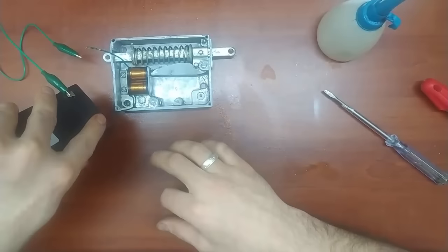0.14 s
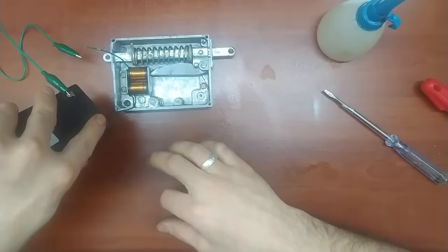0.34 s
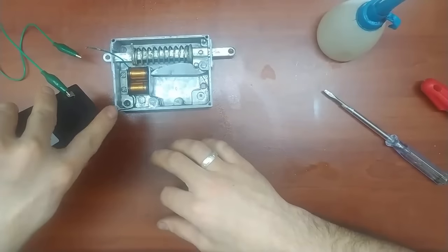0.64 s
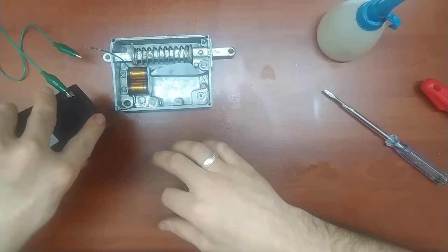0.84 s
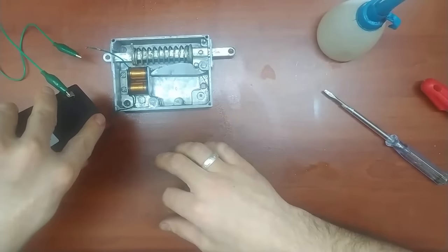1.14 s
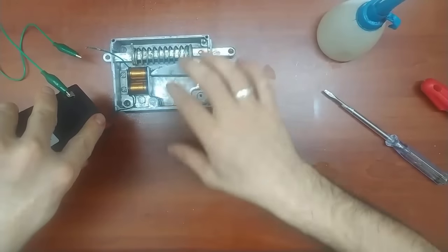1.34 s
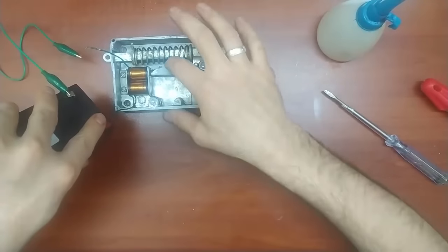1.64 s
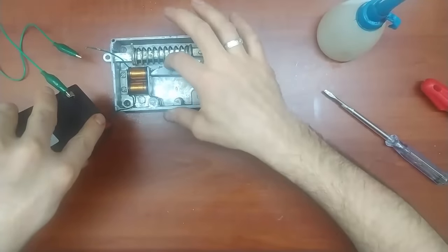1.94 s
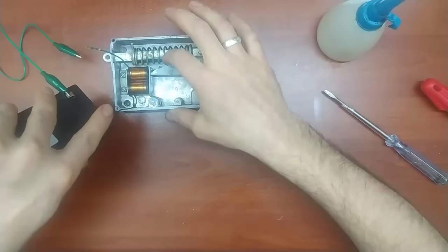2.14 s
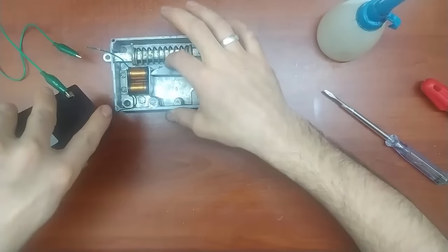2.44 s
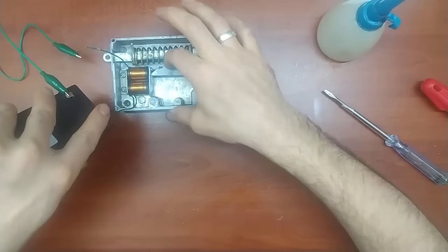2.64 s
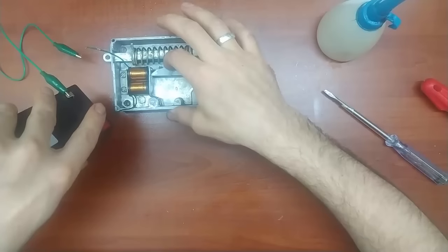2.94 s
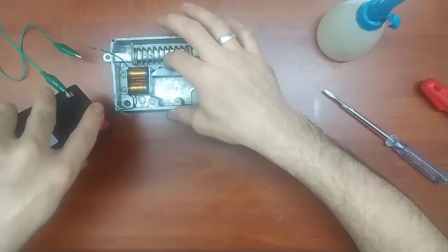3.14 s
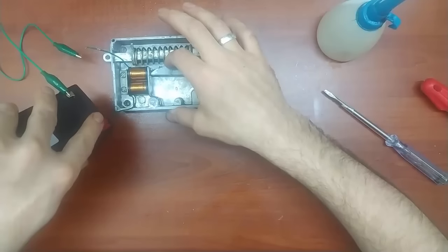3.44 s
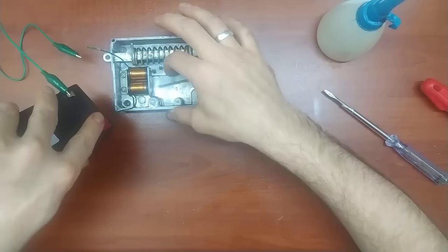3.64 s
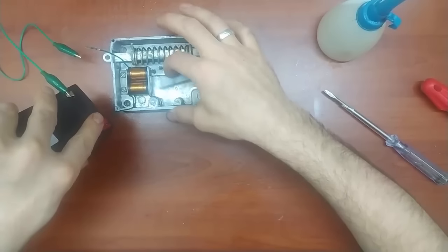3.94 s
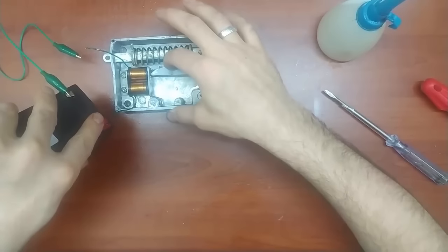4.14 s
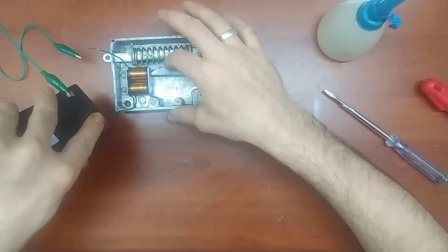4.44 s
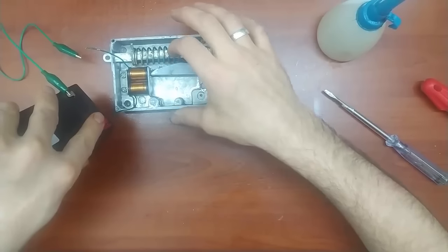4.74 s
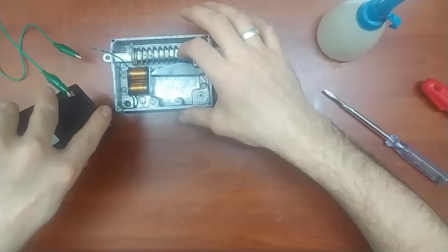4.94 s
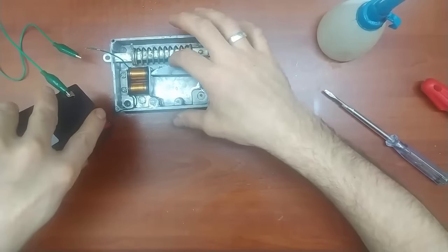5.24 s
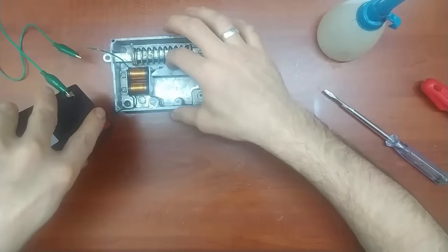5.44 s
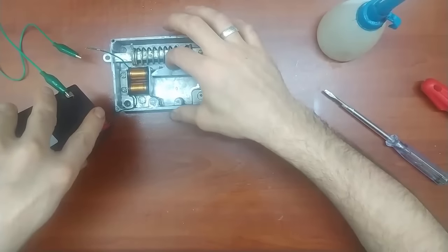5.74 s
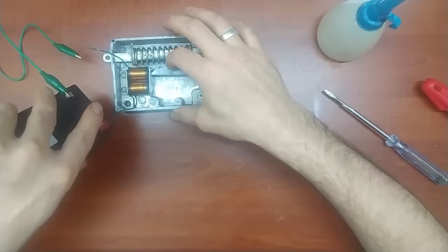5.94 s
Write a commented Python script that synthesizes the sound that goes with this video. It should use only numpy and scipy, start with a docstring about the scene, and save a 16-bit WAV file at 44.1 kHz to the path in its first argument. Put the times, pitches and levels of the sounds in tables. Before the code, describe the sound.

Close stereo pickup above a wooden table in a small quiet room. An electric lock's solenoid knocks, its armature drops back with a quick bouncing clack, then it knocks again. Fingers faintly brush the case, the bolt slams once, another drop follows, then a run of bright alternating catch clicks, a knock, three hard ringing slams and a last drop before faint ticks.

```python
"""An open electric door lock is worked on a wooden table in a small room, with two microphones close above.
The solenoid knocks and its armature drops back bouncing; a hand pushes the sprung bolt, which works
its catch up and down and slams home. Blows are shaped noise, with decaying modes for the steel case and
the table. Sliding fingers are sparse random grains; low room tone is filtered noise behind it all."""
import sys
import numpy as np
from scipy import signal
from scipy.fft import rfft, irfft
from scipy.io import wavfile
from scipy.ndimage import uniform_filter1d

SR = 44100
rng = np.random.default_rng(int(sys.argv[2]) if len(sys.argv) > 2 else 0)


def unload_wav(signal):
    """Save mono or channel-first audio to the path in sys.argv[1] as 16-bit WAV at rate SR, clipped to [-1, 1]."""
    wavfile.write(
        sys.argv[1],
        SR,
        np.round(np.clip(np.atleast_2d(signal).T, -1, 1) * 32767).astype(np.int16),
    )


N = 268560  # length of the scene [samples]
SIZE = 16384  # length of one blow [samples]
T, HZ = np.arange(SIZE) / SR, np.fft.rfftfreq(SIZE, 1 / SR)

# Event levels are relative: each kind of blow adds its own gain; boom, clack and treble tilt its colour.
# The solenoid pulls in; the hand muffles the last pull: (time [s], level [dB], clack near 2.4 kHz [dB])
KNOCKS = [(0.0237, -10.5, 2), (0.7587, -10.5, 1.5), (3.3352, -12, -7)]
# The armature falls back: (time [s], level [dB])
DROPS = [(0.446, -12.5), (2.0585, -14), (4.834, -14.5)]
# The bolt hits its stop, rocking the case on the table more or less: (time [s], level [dB], boom [dB])
SLAMS = [(1.890, -4, 2), (3.8033, -2.5, -1), (4.0925, -5, -1), (4.354, -2.5, -0.5)]
# The catch is pushed up: (time [s], level [dB])
LIFTS = [(2.7462, -14.5), (2.930, -8.5), (3.0942, -8)]
# The catch snaps down: (time [s], level [dB])
SEATS = [(2.8452, -11), (3.036, -9.5), (3.226, -11)]
# Loose parts touch, and a finger scrapes briefly at 0.544 s: (time [s], level [dB], clack near 2.4 kHz [dB],
# treble [dB])
TICKS = [(.544, -33, 0, 13.5), (2.512, -33.5, -8.5, -2), (5.4285, -20, 8.5, 4), (5.938, -25.5, -3, 12)]
# Fingers bump the case: (time [s], level [dB], clack near 2.4 kHz [dB], treble [dB])
BUMPS = [(1.562, -46.5, -2, 6), (1.592, -41, 9, -7), (2.659, -42.5, 4, -4), (5.249, -47, 16, 12),
         (5.694, -39.5, 2, -14)]
# Fingers slide: (time [s], length [s], level [dB])
RUBS = [(1.205, 0.37, -76.5), (1.491, 0.16, -66), (1.662, 0.049, -67), (2.341, 0.079, -64.5),
        (5.254, 0.044, -69)]

# Relative colour of each kind of contact: (frequency [Hz], density [dB per Hz])
KNOCK_COLOUR = [(100, -26.5), (140, -19.5), (200, -6.5), (560, -4), (800, -3.5), (1150, -10.5), (1750, -8),
                (2500, -18.5), (4000, -21.5), (5500, -20), (7000, -27.5), (8500, -19), (11500, -25),
                (15500, -32)]
DROP_COLOUR = [(100, -15), (180, -9), (300, -2.5), (400, -9), (560, -2.5), (900, -3), (1600, -4),
               (3000, -6), (4300, -8.5), (6800, -10.5), (8500, -5.5), (11000, -14.5), (13000, -16),
               (15500, -22)]
SLAM_COLOUR = [(100, -18.5), (160, -8), (230, -2.5), (400, -6.5), (700, -4), (1500, -2), (2700, -1),
               (3500, -3.5), (5200, -5), (7000, -8.5), (8500, -2.5), (11000, -8), (13200, -11.5),
               (15500, -20)]
LIFT_COLOUR = [(100, -14), (190, -10), (270, -2), (420, -13.5), (820, -4.5), (1150, -5.5), (1900, -4.5),
               (2600, 4.5), (3400, -2), (4400, -1.5), (7000, 1), (8700, 1), (11000, -7.5), (15500, -13.5)]
SEAT_COLOUR = [(100, -10.5), (190, -8), (290, 6), (520, -1), (830, 0), (1130, -1), (1600, 1.5),
               (2800, -3.5), (4500, -0.5), (7000, -8.5), (8700, 0.5), (11000, -6.5), (13200, -5),
               (15500, -16.5)]
TICK_COLOUR = [(100, -3.5), (250, 4), (500, -2), (900, 8.5), (1300, 3), (1900, 1.5), (2550, 3.5),
               (4000, -2.5), (5500, 4.5), (7500, -6.5), (9400, -3.5), (11000, -15), (13000, -10),
               (15500, -34)]
BUMP_COLOUR = [(100, -5), (260, 7), (450, -5.5), (900, -7), (2000, -27.5), (6000, -37), (10000, -27.5),
               (15000, -53)]
RUB_COLOUR = [(100, -11), (300, 4), (950, 2.5), (1600, -9), (2600, -9.5), (6000, -15), (10500, -15.5),
              (15500, -22.5)]

# Resonances of table top and case, heard in every blow: (frequency [Hz], width [Hz], height [dB])
BODY_PEAKS = [(178, 15, 4), (233, 18, 7.5), (235, 29, -4), (272, 32, 3), (416, 40, -4), (454.2, 28, 3),
              (520, 22, 2.5), (569.4, 26, 1), (665, 94, -3), (784, 40, 0.5), (935.5, 73, 2.5),
              (1310, 130, 2.5), (1760, 190, 3), (3340, 200, -2)]
# Resonances of the part that is struck: (frequency [Hz], width [Hz], height [dB])
CORE_PEAKS = [(290, 41, 3), (385, 31, -4.5), (474, 140, 3.5), (681, 94, 5.5), (1645, 45, 5.5),
              (2370, 380, 4.5), (7900, 290, 1.5)]
ARMATURE_PEAKS = [(340, 60, 5.3), (551, 42, 9.8), (1375, 42, 1.9), (5060, 560, 7.8), (5380, 800, 7.5)]
BOLT_PEAKS = [(1109, 80, 1.2), (1414, 120, 1.1), (1990, 120, 1), (2720, 220, 5.6), (4330, 560, 5.4),
              (4455, 460, 7)]
CATCH_PEAKS = [(2405, 265, 3.8), (8930, 300, 4.3)]
SEAT_PEAKS = [(835, 120, 7), (2760, 320, 6.5), (4400, 370, 6), (5415, 350, 4.5), (9480, 300, 4.5)]  # the seat that the catch snaps into
# Long modes of the steel case and spring: (frequency [Hz], relative level [dB], t60 [s])
STEEL_MODES = [(1427, -7, .2), (1818, -2, .24), (2422, -8, .19), (2715, -2, .19), (4184, -1, .22),
               (4401, -3, .23), (4496, -5, .21), (4698, -2, .22), (7855, -6, .13), (9029, -2, .17),
               (9175, -2, .17), (9255, -5, .16), (9352, 0, .17), (9383, -2, .16)]
# Long modes of the wooden table top: (frequency [Hz], relative level [dB], t60 [s])
WOOD_MODES = [(178, -11, .3), (217, -5, .33), (279, -3, .3), (456, -3, .19), (518, -1, .2), (566, 2, .19),
              (624, -3, .17)]
# Turning points of the tilt of a blow, from boom through clack to treble: (frequency [Hz])
TOUCH_HZ = [400, 1100, 2400, 5000, 11000]

# How a blow dies away by band; each kind scales the t60 and shifts the crack:
# (frequency [Hz], room t60 [s], rise [s], direct crack over the room [dB], left-right likeness [-1 to 1])
ROOM_BANDS = [(119, .45, 0.028, -6, 0.99), (260, .32, .003, -4, .92), (543, 0.27, .0032, 4, 0.64),
              (1090, .27, 0.0023, 4, 0), (2560, 0.23, 0.001, 2.5, .25), (4870, .2, .0004, 4.5, .07),
              (9300, 0.2, .0004, 2, 0), (15000, .19, 0.00035, 4.5, 0)]
# Relative colour of the room tone: (frequency [Hz], density [dB per Hz])
HUSH_COLOUR = [(12, -26.5), (20, 2), (38, -3.5), (55, -12), (86, -13), (127, -23.5), (241, -17), (377, -27),
               (446, -23.5), (485, -26.5), (949, -27), (2080, -37), (3530, -42), (10500, -47), (16000, -65)]
# Resonances of the microphone port: (frequency [Hz], width [Hz], height [dB])
PORT_PEAKS = [(9300, 1100, 9), (9700, 210, 1.5), (13200, 560, 3.5)]

RING_DB_PER_DB = 1.06  # the harder a blow is for its kind, the larger the share of steel ring
GAP_SHRINK = .85  # each rebound comes sooner than the one before
BOUNCE_SPREAD = .04  # share by which the rebound times vary from blow to blow
# Steel on steel, a first bright snap: level before the crack shift [dB], decay constant [s], lower edge [Hz]
SNAP_DB, SNAP_S, SNAP_HZ = 7.5, 0.00074, 8000
HUSH_DB = -55.5  # level of the room tone ahead of the microphone port
EDGE_HZ = 16200  # upper end of the band


def solenoid_knocks():
    """The solenoid pulls in: single blows on the core that boom in the table."""
    fades = fading(crack_db=-1, crack_s=0.0088, lean_db=2.0, length=1.022)
    return blows(KNOCKS, KNOCK_COLOUR, CORE_PEAKS, fades,
                 gain_db=21.5, bass_db=1.5, dulling=.2, wood_db=-2.5)


def armature_drops():
    """The armature falls back and rebounds three times, ringing case and table."""
    fades = fading(crack_db=5.5, crack_s=0.0019, lean_db=2.5, length=0.98)
    contacts = bouncing(graze_s=.0065, graze_db=-17.5, gap_s=.0098, loss_db=5.0, count=3)
    return blows(DROPS, DROP_COLOUR, ARMATURE_PEAKS, fades, gain_db=21.5, bass_db=0.3, pan_db=0.1,
                 ring_db=-15, wood_db=-18, contacts=contacts)


def bolt_slams():
    """The sprung bolt hits its stop and rebounds twice, with a strong ring of steel."""
    fades = fading(crack_db=5.0, crack_s=.0045, lean_db=0.96, length=1.022)
    contacts = bouncing(graze_s=0.0023, graze_db=-21.5, gap_s=.0055, loss_db=8, count=2)
    return blows(SLAMS, SLAM_COLOUR, BOLT_PEAKS, fades, gain_db=20.5, bass_db=1.0, pan_db=-.5, dulling=.8,
                 ring_db=-8.5, wood_db=-19, contacts=contacts, columns=["boom_db"])


def catch_contacts():
    """The catch grazes, lands and rebounds once, softly."""
    return bouncing(graze_s=0.0016, graze_db=-21, gap_s=.0065, loss_db=17.0, count=1)


def catch_lifts():
    """The catch is pushed up: bright blows without a long ring."""
    fades = fading(crack_db=1.0, crack_s=0.0077, lean_db=0.3, length=1.0)
    return blows(LIFTS, LIFT_COLOUR, CATCH_PEAKS, fades,
                 gain_db=19.5, bass_db=-0.5, pan_db=-0.05, contacts=catch_contacts())


def catch_seats():
    """The catch snaps down into its seat and sets the steel ringing."""
    fades = fading(crack_db=4.5, crack_s=0.0086, lean_db=2.2, length=1.01)
    return blows(SEATS, SEAT_COLOUR, SEAT_PEAKS, fades, gain_db=19.0, bass_db=-0.6, pan_db=-0.36,
                 dulling=.2, ring_db=-10.5, contacts=catch_contacts())


def loose_ticks():
    """Loose parts touch, and a finger scrapes once briefly: small blows with no long ring."""
    fades = fading(crack_db=2.0, crack_s=0.0053, lean_db=4, length=0.92)
    return blows(TICKS, TICK_COLOUR, [], fades, gain_db=12.5, bass_db=2.5, pan_db=-.5, dulling=.55)


def finger_bumps():
    """Fingers bump the case: faint, dull blows that the table takes up."""
    fades = fading(crack_db=-8.5, crack_s=.005, lean_db=3.0, length=1.1)
    return blows(BUMPS, BUMP_COLOUR, [], fades, gain_db=21.0, bass_db=0.7, dulling=1.6, wood_db=-14)


def blows(rows, colour, part, fades, gain_db, bass_db, pan_db=0, dulling=0, ring_db=None, wood_db=None,
          contacts=((0, 0),), columns=("clack_db", "treble_db")):
    """Blows of one kind share their path through the room; soft ones are duller, hard ones ring more.

    dulling is the bass gained per dB of softness [dB per dB]."""
    out = np.zeros((2, N))
    path = rng.standard_normal((2, SIZE))
    shape_db = read(colour, HZ) + peaks(BODY_PEAKS + part, HZ)
    shape_db = shape_db - 10 * np.log10(np.mean(amp(shape_db) ** 2))
    hardest_s = max(contacts, key=lambda contact: contact[1])[0]
    usual_db = np.mean([row[1] for row in rows])

    def strike(s, level_db, boom_db=0, clack_db=0, treble_db=0):
        """One blow: its contacts, then the ring of the steel and the boom of the table."""
        force_db = level_db - usual_db
        thud_db = bass_db + boom_db - dulling * force_db
        contact = response(path + .8 * lumpy_noise(lumpy_db=2.5), fades)
        hit = np.zeros((2, SIZE))
        bounce = 1 + BOUNCE_SPREAD * rng.uniform(-1, 1)
        for delay, db in contacts:
            add(hit, delay * bounce, amp(db) * contact)
        touch_db = read(np.c_[TOUCH_HZ, [thud_db, 0, clack_db, 0, treble_db]], HZ)
        gain = amp(level_db + gain_db + np.array([[pan_db], [-pan_db]]))
        # level out the broad spectrum first, then give it the colour of the blow
        add(out, s, gain * coloured(hit, shape_db + touch_db - broad_db(hit)))
        if ring_db is not None:  # the hardest contact sets the steel ringing at once
            steel = ring(STEEL_MODES, shape_db, spread=0.97, rise=.0005)
            add(out, s + hardest_s, gain * amp(ring_db + RING_DB_PER_DB * force_db) * steel)
        if wood_db is not None:  # the heavy table follows
            wood = ring(WOOD_MODES, shape_db, spread=0.087, rise=0.0053)
            add(out, s + hardest_s, gain * amp(wood_db + thud_db) * wood)

    for s, level_db, *touch in rows:
        strike(s, level_db, **dict(zip(columns, touch)))
    return out


def bouncing(graze_s, graze_db, gap_s, loss_db, count):
    """A part grazes, lands, and rebounds ever sooner and softer: (time after the graze [s], level [dB])."""
    landings = graze_s + gap_s * np.r_[0, np.cumsum(GAP_SHRINK ** np.arange(count))]
    return [(0, graze_db)] + [(s, -loss_db * k) for k, s in enumerate(landings)]


def ring(modes, shape_db, spread, rise):
    """Modes ring on, louder where the blow feeds them; spread sets how far the microphones differ in phase."""
    hz, db, t60 = np.transpose(modes)
    fed_db = db + .5 * np.interp(hz, HZ, shape_db) + rng.standard_normal(len(hz))
    phase = rng.random(len(hz)) + spread * rng.random((2, len(hz)))  # [turns]
    step = np.exp((2j * np.pi * hz - np.log(1000) / t60) / SR)  # turn and loss in one sample
    waves = np.cumprod(np.repeat(step[:, None], SIZE, axis=1), axis=1)
    out = ((amp(fed_db) * np.exp(2j * np.pi * phase)) @ waves).real
    return unit(out * (1 - np.exp(-T / rise)))


def lumpy_noise(lumpy_db):
    """Fresh noise for each blow, its level wavering in small random lumps: a grainy sound."""
    lumps = uniform_filter1d(rng.standard_normal(SIZE), size=80)
    return rng.standard_normal((2, SIZE)) * amp(lumpy_db * lumps / lumps.std())


def fading(crack_db, crack_s, lean_db, length):
    """Level over time by band and microphone: a bright snap, a short crack from the case, the room's tail."""
    hz, t60, rise, direct_db, _ = np.transpose(ROOM_BANDS)[:, :, None, None]
    snap = amp(SNAP_DB) * hz ** 2 / (hz ** 2 + SNAP_HZ ** 2) * np.exp(-T / SNAP_S)
    direct = amp(direct_db) * np.exp(-T / crack_s)
    lean = np.array([[lean_db], [-lean_db]])  # left, right
    crack = amp(crack_db + lean) * np.hypot(snap, direct)
    tail = np.exp(-np.log(1000) * T / (t60 * length))
    return np.hypot(crack, tail) * (1 - np.exp(-(T / rise) ** 2))  # the bass builds up last


def response(noise, fades):
    """One contact at the two microphones: dense reflections, each band dying away at its own speed."""
    spectra, out = rfft(noise), np.zeros((2, SIZE))
    centres, *_, likeness = np.transpose(ROOM_BANDS)
    for share, same, fade in zip(np.eye(len(ROOM_BANDS)), np.clip(likeness, -1, 1), fades):
        left, other = irfft(spectra * read(np.c_[centres, share], HZ))
        out += fade * stereo(left, other, same)
    return out


def rubs():
    """Fingers slide: each slide is a swell of tiny sticks and slips, heard with the room."""
    slips = np.zeros((1, N))
    for s, length, db in RUBS:
        count = int(length * SR)
        caught = rng.random(count) < 1200 / SR  # about 1200 grains a second
        grains = rng.standard_normal(count) * rng.exponential(1, count) * caught
        swell = unit(grains * np.hanning(count))
        add(slips, s, amp(db) * np.sqrt(count) * swell[None])
    fades = fading(crack_db=4.5, crack_s=.003, lean_db=-0.5, length=0.83)
    path = response(rng.standard_normal((2, SIZE)), fades)
    path = unit(coloured(path, read(RUB_COLOUR, HZ) - broad_db(path)))
    return signal.fftconvolve(slips, path, axes=1)[:, :N]


def hush():
    """Quiet room tone: noise partly alike at both microphones in the bass, nearly separate in the treble."""
    hz = np.fft.rfftfreq(N, 1 / SR)
    left, other = rfft(rng.standard_normal((2, N)))
    same = np.clip(read([(40, 0.37), (250, 0.52), (1000, 0.12), (3000, .1)], hz), -1, 1)
    pair = stereo(left, other, same)
    return amp(HUSH_DB) * np.sqrt(N) * unit(irfft(pair * amp(read(HUSH_COLOUR, hz)), N))


def stereo(left, other, same):
    """Left and right channels of a given likeness, from two independent noises."""
    return np.array([left, same * left + np.sqrt(1 - same ** 2) * other])


def amp(db):
    """Decibels to gain."""
    return 10 ** (np.asarray(db) / 20)


def unit(x):
    """Scales to a mean energy of 1 a channel."""
    return x / np.sqrt(np.mean(np.sum(x ** 2, -1)) + 1e-20)


def read(points, hz):
    """Joins (frequency [Hz], value) points on a log-frequency axis."""
    f, value = np.transpose(points)
    return np.interp(np.log(hz + 1), np.log(f + 1), value)


def peaks(rows, hz):
    """The dB curve of a set of resonances."""
    return sum(db / (1 + (2 * (hz - f) / width) ** 2) for f, width, db in rows)


def add(mix, s, sound):
    """Mixes a sound in at a time [s]."""
    part = mix[:, max(round(s * SR), 0):][:, :sound.shape[1]]
    part += sound[:, :part.shape[1]]


def coloured(x, db):
    """Filters by a dB curve with minimum phase, so that nothing sounds before the attack."""
    cepstrum = irfft(np.log(amp(db)))
    cepstrum[1:SIZE // 2] *= 2
    cepstrum[SIZE // 2 + 1:] = 0
    impulse = irfft(np.exp(rfft(cepstrum)))
    return signal.fftconvolve(x, impulse[None], axes=1)[:, :x.shape[1]]


def broad_db(x):
    """The spectrum of a sound in dB, averaged over about an eighth of an octave."""
    total = np.cumsum((abs(rfft(x)) ** 2).mean(0))
    k = np.arange(len(HZ))
    lo, hi = np.maximum(k - k // 24 - 6, 0), np.minimum(k + k // 24 + 6, k[-1])
    return 10 * np.log10((total[hi] - total[lo]) / (hi - lo) + 1e-12)


def scene():
    """All the moving parts of the lock and the hand at work, over the room tone."""
    lock = solenoid_knocks() + armature_drops() + bolt_slams() + catch_lifts() + catch_seats() + loose_ticks()
    hand = finger_bumps() + rubs()
    return lock + hand + hush()


def record(dry):
    """The microphone port rings in the treble, the loudest peaks flatten, and the band ends."""
    heard = np.clip(coloured(dry, peaks(PORT_PEAKS, HZ)), -1, 1)
    lowpass = signal.firwin(255, EDGE_HZ, window=("kaiser", 8), fs=SR)
    return signal.oaconvolve(heard, lowpass[None], "same")


dry = scene()
out = record(dry)
unload_wav(out)
```